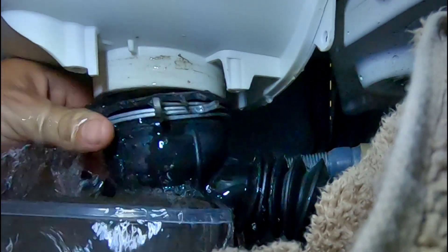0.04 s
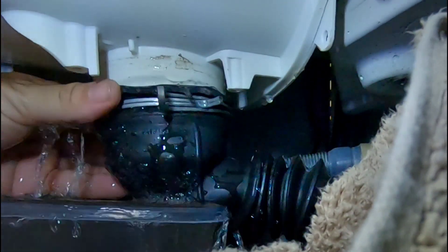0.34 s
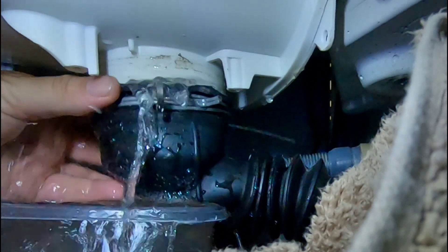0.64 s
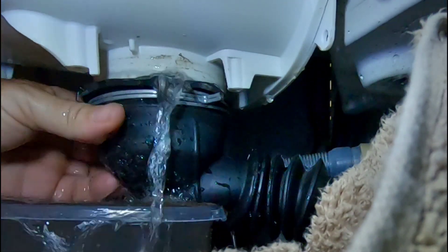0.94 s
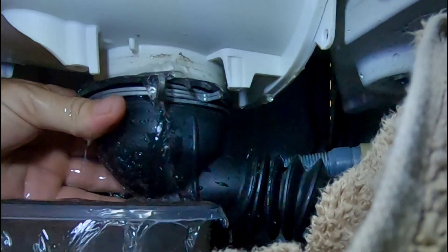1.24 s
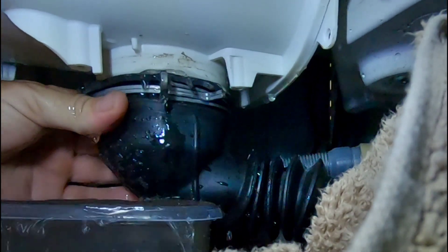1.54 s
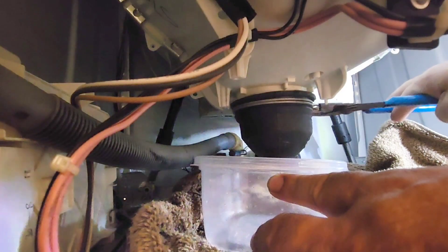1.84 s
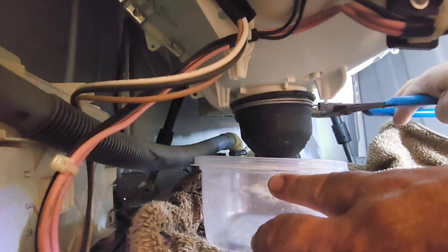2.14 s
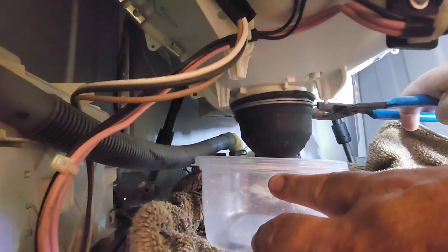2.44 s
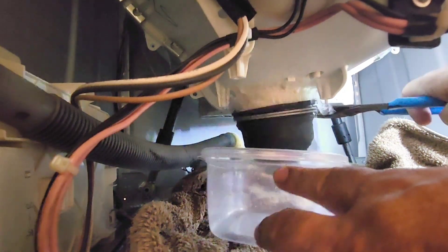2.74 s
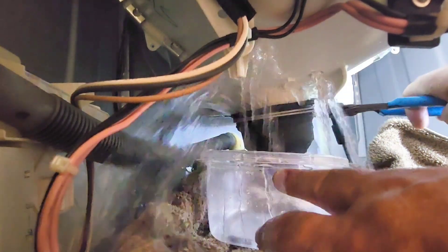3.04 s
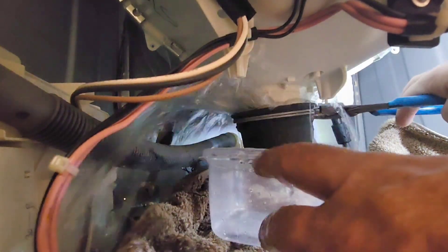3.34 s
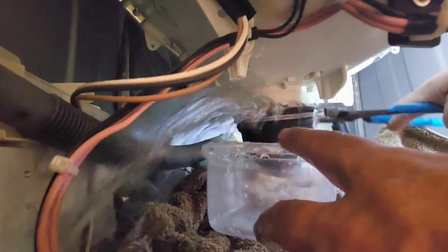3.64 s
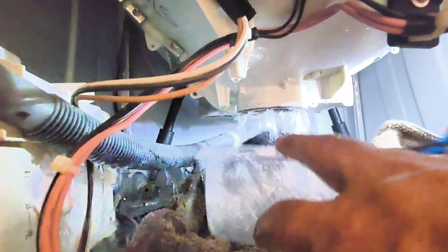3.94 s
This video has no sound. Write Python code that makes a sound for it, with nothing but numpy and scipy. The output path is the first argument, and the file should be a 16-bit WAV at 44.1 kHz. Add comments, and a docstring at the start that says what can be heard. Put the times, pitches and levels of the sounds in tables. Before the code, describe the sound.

Water drums briefly into a plastic tub, then trickles and plops, close up over a low rumble. It cuts off at 1.7 seconds; the tub knocks once, followed by faint bumps and rustling. From about 2.6 seconds water spits from the hose, swelling from 3 seconds into a loud, hissing, gurgling gush. A heavy, hollow slosh hits the tub near 3.9 seconds, with a tight echo.

```python
"""Draining a washing machine

Water trickles and plops from a loosened pump hose into a plastic tub, over a low rumble.
After an abrupt break the tub knocks and pliers work the clamp; the seal lets go, spits, then
gushes, ending in a heavy slosh. The water is ringing air bubbles and splashy noise; the knocks
are damped modes of the tub and, faintly, the clamp. The cabinet answers with a close echo."""
import sys
import numpy as np
from scipy import signal
from scipy.fft import rfft, irfft, next_fast_len
from scipy.io import wavfile
from scipy.ndimage import uniform_filter1d, map_coordinates

SR = 44100
rng = np.random.default_rng(int(sys.argv[2]) if len(sys.argv) > 2 else 0)


def bounce(signal):
    """Save signal as a 16-bit WAV file at the path given by the first command-line argument."""
    frames = np.transpose(np.atleast_2d(signal))
    limited = np.clip(frames, -1, 1)
    pcm = np.round(limited * 32767).astype(np.int16)
    wavfile.write(sys.argv[1], SR, pcm)


N = 176400
TIME = np.arange(N) / SR  # scene clock
T = np.arange(SR // 3) / SR  # one-shot clock


# Gush faders: t/s, spray level/dB, splatter level/dB
GUSH_FADERS = [(2.55, -62, -47), (2.62, -64.5, -53), (2.67, -63, -53.5), (2.72, -47, -51),
               (2.78, -52.5, -62), (2.88, -52, -55), (2.915, -40, -41.5), (2.95, -45.5, -44),
               (3.0, -38, -40.5), (3.09, -36, -38), (3.24, -34, -41.5), (3.3, -33, -35.5),
               (3.41, -33, -45.5), (3.5, -28.5, -39.5), (3.56, -33.5, -40.5), (3.68, -31.5, -35),
               (3.8, -31.5, -33), (3.87, -27.5, -26), (4, -32, -29.5)]
# Bright spray and low splatter EQs: f/Hz, level/dB
SPRAY_EQ = [(150, -38), (500, -16), (1100, -17.5), (1600, -4.5), (2000, -10), (2800, -5.5), (4800, -5),
            (7400, -3), (9500, -11), (12000, -6), (14600, -7.5), (15700, -8)]
SPLATTER_EQ = [(60, -26.5), (120, -6.5), (190, -6), (280, -5.5), (420, -0.5), (700, 2), (1100, -7.5),
               (2000, -5.5), (5000, -60)]

def gush():
    """The seal opens: hissing spray, gurgle and low splatter swell with the flow."""
    spray_db, splatter_db = curves(GUSH_FADERS)
    opening = np.clip((TIME - 2.53) / 0.071, 0, 1)
    droplets = cabinet(grains(rate=2200, cycles=13.4, scatter_db=3, band_hz=(725, 16200)), wet_db=1.5)
    hiss = noise(N) * amp(2.5 + 2.9 * wobble(90) + wobble(34.7))
    spray = coloured(droplets + hiss, SPRAY_EQ)
    gurgle = cabinet(grains(rate=110, cycles=26, scatter_db=3, band_hz=(700, 5000)), wet_db=-4)
    blobs = cabinet(grains(rate=600, cycles=5, scatter_db=2.5, band_hz=(91, 3040)), wet_db=-1.5)
    splatter = amp(splatter_db) * coloured(blobs, SPLATTER_EQ)
    return opening * (amp(spray_db + 4.5) * (spray + amp(-10) * gurgle) + splatter)


# Spurt cues: t/s, level/dB, f/Hz, ring t60/s, splash mix/dB, left over right/dB
SPURT_CUES = [(2.678, -23.5, 2328, 0.018, -11.5, -6), (2.707, -15, 4460, 0.0059, -15, -7),
              (2.712, -30.5, 1490, 0.031, -0.5, 9), (2.727, -26, 1730, 0.03, -2.5, -6),
              (2.852, -29, 757, 0.036, -2.5, -2), (2.853, -35, 2010, 0.035, -12, -4),
              (2.936, -35.5, 700, 0.026, -19, -5), (2.974, -26, 810, 0.021, -14, 2),
              (2.992, -25.5, 1203, 0.026, -3, -1), (2.998, -27, 2000, 0.019, -6, 7),
              (3.079, -19, 744, 0.022, -8, 5), (3.08, -27, 1880, 0.026, -14, 0),
              (3.12, -22, 3260, 0.032, -21, -1), (3.139, -24, 875, .022, -22, 0),
              (3.221, -25, 3170, .02, -18, 0), (3.293, -16, 2350, 0.017, -8.5, 9),
              (3.314, -13.5, 278, 0.021, -14, -3), (3.316, -13.5, 730, 0.018, -21, 0),
              (3.347, -25, 1750, 0.016, -2, 7), (3.36, -9, 794, 0.025, -14.5, 1),
              (3.363, -18, 1650, .025, -7, -2), (3.435, -13, 2340, 0.014, -10, 8),
              (3.439, -21, 4660, 0.037, -30, 15), (3.478, -2.5, 5540, 0.0056, -28, -2),
              (3.566, -23.5, 1990, .03, -15, 9), (3.632, -26, 3220, 0.026, 3, 6.5),
              (3.724, -21, 740, 0.022, -4, 2), (3.658, -16, 4760, 0.034, -9, 3.5),
              (3.696, -9, 5200, 0.0084, -26, 2), (3.753, -14.5, 1954, 0.018, -14, 6),
              (3.796, -21, 4370, 0.042, -20, 7), (3.802, -17, 7000, 0.019, -32, -2),
              (3.817, -4.5, 643, 0.014, -25, -1), (3.823, -16, 1220, 0.023, -24, -6),
              (3.83, -17.5, 1520, 0.045, -22, -5), (3.849, -11, 1560, 0.033, -20, 2)]
# Sharp splash EQ: f/Hz, level/dB
SPURT_EQ = [(200, -7), (700, -3), (2200, 13.5), (5000, 3.5), (9000, -1.5), (15000, 1)]

def spurts():
    """Air and water spit from the seal, each spurt a bubble with a sharp splash."""
    out = np.zeros((2, N))
    for start, db, hz, t60, splash_db, pan_db in SPURT_CUES:
        pan = amp([[pan_db / 2], [-pan_db / 2]])
        add(out, start, amp(db) * pan * bubble(hz, t60, splash_db, SPURT_EQ, 0.035, wet_db=-1))
    return out


# Heavy slaps: t/s, level/dB, attack/s, t60/s
SLAP_CUES = [(3.849, -12.5, 0.0015, 0.069), (3.872, -12.5, 0.025, 0.26)]
# Slap EQ: f/Hz, level/dB
SLAP_EQ = [(24, -32), (40, -9), (103, -5.5), (244, -10.5), (480, -8), (580, -10), (680, 1.5), (824, -8.5),
           (1060, -6.5), (1500, -7.5), (1820, -20), (2170, -8.5), (2710, -18), (4130, -16.5), (15000, -38)]
# Hollow rings: t/s, level/dB, f/Hz, t60/s
CHURN_CUES = [(3.876, -13.5, 690, 0.14), (3.894, -12.5, 744, 0.12)]

def sloshes():
    """The full stream slaps the tub, then churns in it and sets its hollow ringing."""
    out = np.zeros((2, N))
    for start, db, rise, t60 in SLAP_CUES:
        slap = coloured(noise(len(T)), SLAP_EQ)
        add(out, start, amp(db + 5) * slap * attack(rise) * decay(t60))
    for start, db, hz, t60 in CHURN_CUES:
        ring = damped_sine(hz, t60) * attack(0.009)
        add(out, start, amp(db) * cabinet(ring, wet_db=-11))
    return out


# Faders for the stream and its finest droplets: t/s, level/dB
TRICKLE_FADER = [(0.0, -42.5), (0.402, -42.5), (0.61, -36), (0.658, -41), (0.88, -38.5), (1.24, -52),
                 (1.324, -60), (1.4, -46.5), (1.572, -45.5), (1.684, -50), (1.69, -47), (1.7, -47)]
SPARKLE_FADER = [(0, -57), (.25, -59.5), (.5, -60.5), (.85, -53), (.96, -52), (1.07, -53), (1.13, -66),
                 (1.175, -42), (1.27, -63.5), (1.35, -61), (1.4, -55), (1.53, -48), (1.62, -60), (1.7, -54)]
# Stream EQ: f/Hz, level/dB
TRICKLE_EQ = [(150, -9.5), (340, -3), (550, -5), (900, -6.5), (1500, -7.5), (2200, -3), (3100, -12.5),
              (4800, -9.5), (6500, -27), (9000, -30), (15500, -42.5)]

def trickle():
    """A thin stream patters and tinkles into the tub, with fine droplets sparkling on top."""
    stream_db, = curves(TRICKLE_FADER)
    sparkle_db, = curves(SPARKLE_FADER)
    patter = cabinet(grains(rate=1400, cycles=20, scatter_db=3, band_hz=(300, 15500)), wet_db=4)
    tinkle = cabinet(grains(rate=260, cycles=60, scatter_db=3.5, band_hz=(1400, 7500)), wet_db=-1)
    fine = cabinet(grains(rate=900, cycles=20, scatter_db=3.5, band_hz=(5000, 15500)), wet_db=9)
    sparkle = coloured(fine, [(4000, -7), (7500, 2.5), (10000, -5), (15500, -17)])
    return amp(stream_db) * coloured(patter + tinkle, TRICKLE_EQ) + amp(sparkle_db + 1.5) * sparkle


# Pour fader: t/s, level/dB
POUR_FADER = [(0, -29), (.06, -29.5), (.13, -28), (.18, -34), (.24, -41.5), (.33, -63), (.42, -49),
              (.46, -52), (.6, -64), (.75, -43), (.8, -38.5), (.88, -44.5), (.95, -56), (1.7, -81)]
# Resonances of the tub's hollow: f/Hz, bandwidth/Hz, level/dB
HOLLOW_BANDS = [(562, 35, 2), (800, 190, -13), (1147, 153, 4), (1480, 150, -11.5), (2014, 220, -3.5),
                (2630, 420, -10.5)]

def pour():
    """The first pour drums into the tub, whose hollow resonates."""
    def hollow(f):
        return sum((-1) ** k * amp(db) * 1j * f * width / (hz * hz - f * f + 1j * f * width)
                   for k, (hz, width, db) in enumerate(HOLLOW_BANDS))
    level_db, = curves(POUR_FADER)
    drumming = cabinet(grains(rate=1100, cycles=12, scatter_db=2.5, band_hz=(300, 3600)), wet_db=0)
    return amp(level_db) * unit(filtered(drumming, hollow))


# Plop cues: t/s, level/dB, f/Hz, ring t60/s, splash mix/dB
DROP_CUES = [(.001, -11.5, 945, 0.018, -22), (0.021, -19, 1070, 0.024, -38),
             (.051, -15.5, 1165, 0.033, -30.5), (.075, -16.5, 1020, 0.021, -24),
             (0.115, -10.5, 1063, 0.02, -28), (0.131, -15, 1060, 0.013, -24), (.217, -26, 2640, 0.042, -15),
             (.224, -23.5, 800, 0.021, -24), (.255, -27, 1043, 0.036, -26), (.277, -37, 581, 0.11, -24),
             (0.288, -25, 2020, 0.018, -5.5), (.325, -23, 2320, 0.017, -18), (0.442, -19, 1300, 0.017, -17),
             (0.455, -24, 1543, 0.046, -27), (0.475, -29, 2470, 0.036, -23),
             (0.491, -17.5, 1670, 0.016, -7.5), (.503, -19.5, 2020, 0.024, -29),
             (.563, -34.5, 2020, 0.074, 5), (0.677, -33, 2270, .03, -11), (.705, -27, 1460, 0.024, -11),
             (.776, -16.5, 1246, 0.017, -26), (.778, -21.5, 635, 0.021, -27), (.851, -22, 2194, 0.039, -26),
             (0.857, -19.5, 610, 0.02, -17), (.859, -27, 900, 0.018, -16), (0.895, -28, 3580, 0.02, -9),
             (0.949, -29, 3980, 0.04, -11), (1.039, -29.5, 3860, 0.038, -2),
             (1.091, -32.5, 3560, 0.016, -8), (1.117, -24.5, 2600, 0.017, -29),
             (1.132, -23, 2214, 0.038, -8.5), (1.189, -23.5, 2370, 0.021, -26),
             (1.224, -26.5, 2770, 0.017, -19), (1.302, -28.5, 1450, 0.037, -15.5),
             (1.348, -31, 2390, 0.024, -16), (1.384, -22.5, 1760, 0.03, -8.5),
             (1.401, -32.5, 3610, 0.077, -6), (1.428, -25, 790, 0.01, -13),
             (1.455, -24.5, 2150, 0.045, -4.5), (1.508, -22.5, 6200, 0.022, -5.5),
             (1.554, -24, 4540, 0.032, -4.5), (1.573, -22.5, 2200, 0.026, -10),
             (1.599, -33.5, 4570, 0.024, 0.5), (1.632, -34.5, 3860, 0.022, -4),
             (1.692, -29.5, 4850, 0.021, -1.5)]
# Soft splash EQ: f/Hz, level/dB
DROP_EQ = [(200, -21), (700, -1), (2200, -0.5), (5000, -3.5), (8000, -10), (10500, -27), (15000, -41.5)]

def drops():
    """Single drops plop, each trapping a bubble."""
    out = np.zeros((2, N))
    for start, db, hz, t60, splash_db in DROP_CUES:
        add(out, start, amp(db) * bubble(hz, t60, splash_db - 1.5, DROP_EQ, 0.03, wet_db=0.5))
    return out


# Deep gulps and thumps: t/s, level/dB, f/Hz, t60/s
GULP_CUES = [(0.214, -23.5, 85.5, 0.096), (.39, -28.5, 248, .08), (.58, -25, 154, 0.078),
             (0.601, -19, 97, 0.068), (.6, -35.5, 369, 0.18), (0.881, -27, 116.4, 0.22),
             (0.961, -30, 122.4, 0.25), (1.14, -36, 351, 0.13), (1.49, -27, 135, 0.052),
             (2.105, -28.5, 127, 0.1), (2.925, -35, 129, 0.19), (2.973, -25, 124, .12),
             (3.04, -27, 123, 0.15), (3.078, -23.5, 370, 0.071), (3.199, -29.5, 122, 0.126),
             (3.313, -17, 210, 0.035), (3.361, -15.5, 193, 0.028), (3.849, -3.5, 430, 0.015),
             (3.855, -11, 124, 0.065), (3.872, -6, 100, 0.048)]

def gulps():
    """Large pockets of air ring briefly as they enter the hose."""
    out = np.zeros((2, N))
    for start, db, hz, t60 in GULP_CUES:
        add(out, start, amp(db) * damped_sine(hz, t60) * attack(0.5 / hz))
    return out


# Knock cues: t/s, level/dB, click mix/dB
KNOCK_CUES = [(1.774, -11.5, -10.5), (1.85, -24, -26), (2.092, -32, -22), (2.214, -52.5, -4),
              (2.35, -38.5, -6.5), (2.474, -54, -9.5), (2.57, -33.5, -6), (2.592, -35.5, -3),
              (2.615, -32.5, -8), (2.796, -33, 2)]
# Plastic tub modes, plus a faint lingering ring of the hose clamp (last row): f/Hz, level/dB, t60/s
KNOCK_MODES = [(113, -15, 0.26), (148, -17, 0.16), (214, -13.5, 0.076), (278, -10, 0.16), (371, -4, .06),
               (460, -8, 0.1), (550, -11.5, 0.13), (688, 2, 0.071), (753, -7, 0.048), (1250, -20.5, 0.1),
               (1490, -8.5, .035), (2038, -34.5, 0.27)]
# Dull thud EQ: f/Hz, level/dB
THUD_EQ = [(40, -14), (110, -3), (300, -0.5), (700, -7.5), (1000, -23), (4000, -51)]

def knocks():
    """The tub is bumped: a light touch, then a click and thud as the tub and, faintly, the clamp ring."""
    full_blow_db = -9.5
    click_eq = [(200, 8), (1200, 0), (3000, -4), (6500, -10), (9000, -17.5), (15000, -20)]
    out = np.zeros((2, N))
    for start, db, click_db in KNOCK_CUES:
        tilt_db = 0.24 * (db - full_blow_db)  # per octave: softer bumps are duller
        ring = np.zeros(len(T))
        for k, (hz, mode_db, t60) in enumerate(KNOCK_MODES):
            gain = amp(mode_db + tilt_db * np.log2(hz / 400) + rng.normal(0, 0.62))
            ring += (-1) ** k * gain * damped_sine(hz, t60)
        click = mono_noise(click_eq) * decay(0.044)
        body = cabinet(ring * attack(0.0038), wet_db=-5.5)
        add(out, start, amp(db - 5.5) * (body + amp(click_db - 2) * cabinet(click, wet_db=3)))
        thud = coloured(noise(len(T)), THUD_EQ) * decay(0.15) * attack(0.0025)
        add(out, start, amp(db - 8) * thud)
        add(out, start - 0.007, amp(db + click_db - 21) * click)  # first touch
    return out


# Rustle fader: t/s, level/dB
RUSTLE_FADER = [(1.7, -86), (1.722, -53), (1.75, -60), (1.85, -66), (1.91, -67), (1.97, -73), (2.05, -68.5),
                (2.13, -79.5), (2.3, -80), (2.42, -86.5), (2.5, -74), (2.6, -66)]
# Rustle EQ: f/Hz, level/dB
RUSTLE_EQ = [(300, -9), (1300, 0.5), (2100, 0), (3200, -6), (5000, -6.5), (7400, -5.5), (9000, -25),
             (15000, -34)]

def handling():
    """Hands and pliers shift with a faint, uneven rustle."""
    level_db, = curves(RUSTLE_FADER)
    return amp(level_db + 1.4 * wobble(35)) * coloured(noise(N), RUSTLE_EQ)


# Rumble fader: t/s, level/dB
RUMBLE_FADER = [(0, -40.5), (.2, -41), (.32, -43.5), (.52, -44.5), (.6, -41), (.71, -44), (.87, -41),
                (1.1, -43.5), (1.4, -48), (1.58, -36), (1.71, -49.5), (1.85, -40.5), (1.97, -53.5),
                (2.1, -55.5), (2.4, -56.5), (2.62, -57.5), (2.88, -54), (3.0, -43.5), (3.58, -41.5),
                (3.8, -29), (3.87, -42), (3.93, -58), (4, -37)]
# Rumble and room air EQs: f/Hz, level/dB
RUMBLE_EQ = [(20, -16.5), (40, -13.5), (62, 4.5), (90, -10), (118, 1), (150, -3), (230, -3), (330, -7.5),
             (600, -16.5), (1200, -29), (4000, -54.5)]
AIR_EQ = [(120, -20.5), (200, -6.5), (400, -14), (700, -19), (1300, -34), (2200, -37), (3500, -41),
          (5000, -39), (7400, -36), (9000, -57), (15000, -65.5)]

def background():
    """The bed: an uneven low rumble over a steady one, a wavering hum and faint room air."""
    rumble_db, = curves(RUMBLE_FADER)
    steady_eq = [(20, -17.5), (40, -6), (70, -4), (100, -5.5), (200, -20), (600, -30), (2000, -78)]
    steady = amp(-49) * coloured(noise(N), steady_eq)
    hum = amp(-57 + 5.5 * wobble(4.3)) * np.sin(2 * np.pi * 118.9 * TIME + wobble(8.6))
    rumble = amp(rumble_db) * coloured(noise(N), RUMBLE_EQ)
    return rumble + steady + hum + amp(-71) * coloured(noise(N), AIR_EQ)


BUBBLE_RISE, FROTH_HZ = 0.072, 3300  # fractional pitch rise over a life; crossover from ring to froth

def bubble(hz, t60, splash_db, splash_eq, splash_t60, wet_db):
    """A wet tick and the rising ring of trapped air; small bubbles shatter into froth."""
    def ring(pitch, life):
        glide = pitch * (1 + BUBBLE_RISE * (np.minimum(T / life, 1) - 0.25))
        return np.sin(2 * np.pi * np.cumsum(glide) / SR) * decay(life) * attack(1.4 / pitch)
    rings = ring(hz, t60)
    for late, detune in rng.random((4, 2)):  # satellite bubbles
        add(rings, late * 0.02, amp(-11) * ring(hz * np.exp(0.216 * (4 * detune - 2)), t60 * 0.41))
    shattered = 1 / (1 + (FROTH_HZ / hz) ** 4)
    froth = mono_noise([(hz / 2, -30), (hz * 0.85, -4), (hz, 0), (hz * 1.2, -4), (hz * 2, -26)])
    froth *= amp(-6.5) * decay(np.sqrt(t60 * 0.042)) * attack(0.0014)
    body = np.sqrt(1 - shattered) * rings + np.sqrt(shattered) * froth
    tick = amp(splash_db) * mono_noise(splash_eq) * decay(splash_t60) * attack(0.002)
    return cabinet(body + tick, wet_db)


def grains(rate, cycles, scatter_db, band_hz):
    """A stereo rain of tiny rising bubbles, `rate` a second, dying at 60 dB per `cycles` periods."""
    low_hz, high_hz = band_hz
    when, place, size, side = rng.random((int(rate * N / SR), 4)).T
    hz = (np.sqrt(low_hz) + place * (np.sqrt(high_hz) - np.sqrt(low_hz)))[:, None] ** 2
    samples = np.arange(min(1200, 4000000 // len(when), int(cycles * SR / low_hz / 2)))
    age = hz * samples / SR / cycles  # 1 at 60 dB down
    gain = amp(-scatter_db * np.log(0.0043 + size))[:, None] * hz ** 0.75  # evens the spectrum
    envelope = amp(-60 * age) * (1 - np.exp(-(age * cycles / 1.21) ** 2))
    phase = 2 * np.pi * cycles * age * (1 + BUBBLE_RISE * np.minimum(age, 1) / 2)
    waves = gain * envelope * np.sin(phase)
    slots = ((when * N).astype(int) + N * (side > 0.5))[:, None] + samples
    pair = np.bincount(slots.ravel(), waves.ravel(), 2 * N)[:2 * N].reshape(2, N)
    return unit(spread(pair))


# Cabinet reverb time: f/Hz, t60/s
CABINET_DECAY = [(150, 0.26), (700, 0.074), (2500, 0.11), (7000, 0.057), (15000, 0.029)]

def cabinet(x, wet_db):
    """Adds the short, dense echo of the machine's underside."""
    hz, t, spectrum = signal.stft(noise(len(T)), SR, nperseg=256)
    fade = amp(-60 * t / along(CABINET_DECAY, hz)[:, None])
    tail = signal.istft(spectrum * fade, SR, nperseg=256)[1]
    x = np.atleast_2d(x)
    echo = signal.fftconvolve(x, tail / np.linalg.norm(tail[0]), axes=1)[:, :x.shape[1]]
    return x + amp(wet_db) * echo


# Stereo image: f/Hz, left-right correlation
CORRELATION = [(60, .94), (130, .87), (290, .78), (640, .2), (1300, -.3), (3000, 0), (15000, 0)]

def spread(pair):
    """Two unrelated signals to left and right: alike in the bass, unrelated in the treble."""
    def mid_side_gains(hz):
        angle = np.arccos(along(CORRELATION, hz)) / 2
        return np.array([np.cos(angle), np.sin(angle)])
    mid, side = filtered(pair, mid_side_gains)
    return np.array([mid + side, mid - side])


def noise(size):
    """Stereo white noise."""
    return spread(rng.standard_normal((2, size)))


def mono_noise(eq):
    """Shaped noise for a one-shot."""
    return coloured(rng.standard_normal((1, len(T))), eq)[0]


def coloured(x, eq):
    """x through a minimum-phase EQ of (f/Hz, level/dB) points, at rms 1."""
    cepstrum = irfft(np.log(amp(along(eq, np.fft.rfftfreq(8192, 1 / SR)))))
    cepstrum[1:4096] *= 2
    cepstrum[4097:] = 0
    impulse = irfft(np.exp(rfft(cepstrum)))
    return unit(signal.fftconvolve(x, impulse[None], axes=1)[:, :x.shape[1]])


def filtered(x, response):
    """x through a frequency response."""
    n = x.shape[-1]
    padded = next_fast_len(n + 8192)
    return irfft(rfft(x, padded) * response(np.fft.rfftfreq(padded, 1 / SR)), padded)[..., :n]


def damped_sine(hz, t60):
    """One ringing mode."""
    return np.sin(2 * np.pi * hz * T) * decay(t60)


def attack(seconds):
    """Exponential fade-in."""
    return 1 - np.exp(-T / seconds)


def decay(t60):
    """Falls 60 dB in t60 seconds."""
    return amp(-60 * T / t60)


def amp(db):
    """Decibels to gain."""
    return 10 ** (np.asarray(db) / 20)


def unit(x):
    """Scaled to rms 1."""
    return x / np.sqrt(np.mean(x ** 2) + 1e-20)


def along(points, hz):
    """Reads (f/Hz, value) points on a log axis."""
    knots, values = np.transpose(points)
    return np.interp(np.log(hz + 1), np.log(knots + 1), values)


def curves(rows):
    """One automation curve for each column after the time."""
    times, *columns = np.transpose(rows)
    return [np.interp(TIME, times, column) for column in columns]


def wobble(rate):
    """A smooth random curve, `rate` knots a second."""
    return map_coordinates(rng.standard_normal(4000), [TIME * rate], mode="wrap")


def add(out, start, x):
    """Mixes x in at `start` seconds."""
    i = max(0, round(start * SR))
    out[..., i:i + x.shape[-1]] += x[..., :out.shape[-1] - i]


BREAK_START_S, BREAK_END_S = 1.7, 1.717

def scene():
    """The leak before the break, the clamp and the gush after it; gulps and rumble throughout."""
    leak = (trickle() + pour() + drops()) * (TIME < BREAK_START_S)
    return leak + knocks() + handling() + gush() + spurts() + sloshes() + gulps() + background()


# Width automation: t/s, width (0 mono, 1 full stereo)
WIDTH_FADER = [(.85, 0), (1.1, .5), (1.7, .6), (1.71, 1)]

def record(dry):
    """The image opens from mono to stereo, the sound mutes at the break, and the top is cut."""
    top_hz = 15800
    width, = curves(WIDTH_FADER)
    mid, side = dry.mean(0), width * (dry[0] - dry[1]) / 2
    gate = uniform_filter1d(1. * ((TIME < BREAK_START_S) | (TIME > BREAK_END_S)), size=40)
    stereo = gate * np.array([mid + side, mid - side])
    return filtered(stereo, lambda hz: np.clip((top_hz + 100 - hz) / 200, 0, 1))


dry = scene()
out = record(dry)
bounce(out)
```